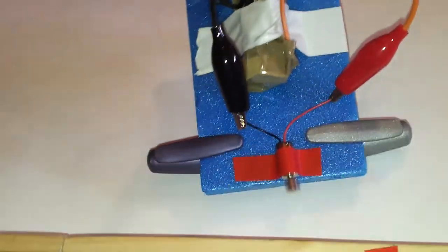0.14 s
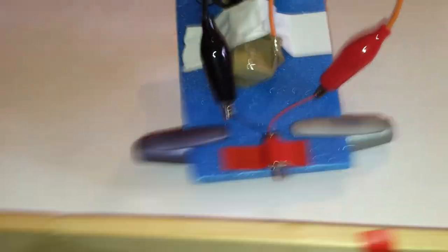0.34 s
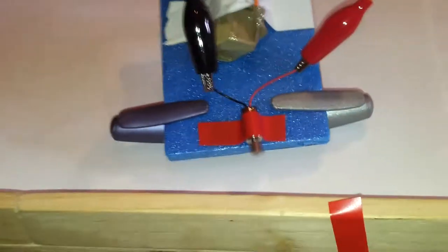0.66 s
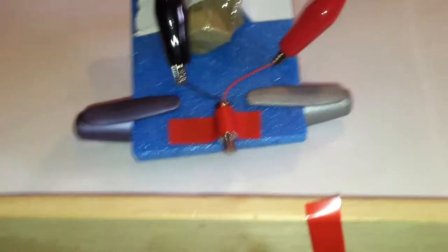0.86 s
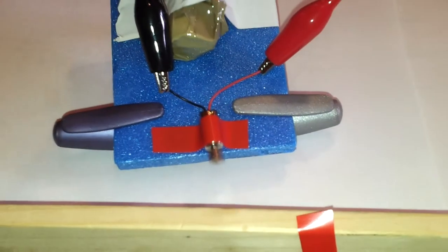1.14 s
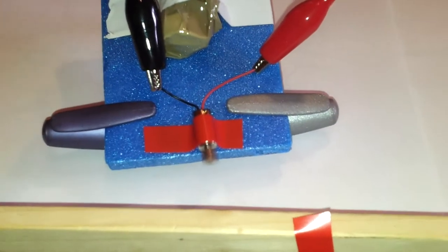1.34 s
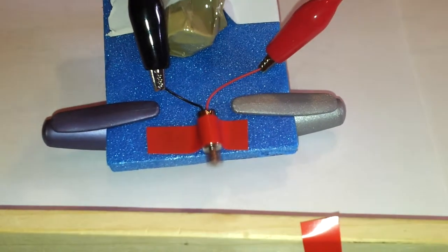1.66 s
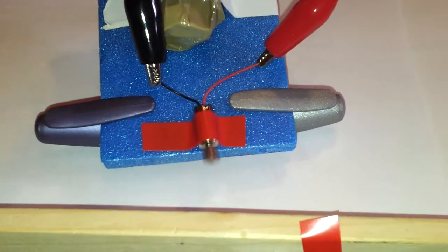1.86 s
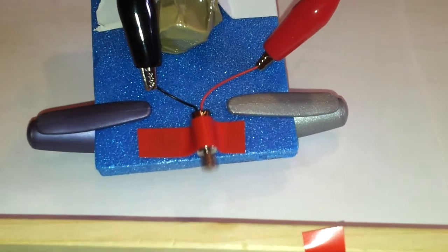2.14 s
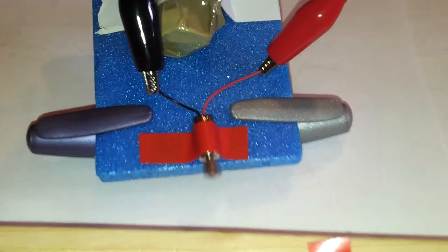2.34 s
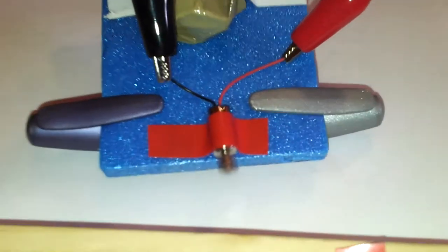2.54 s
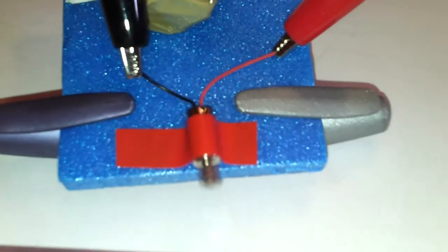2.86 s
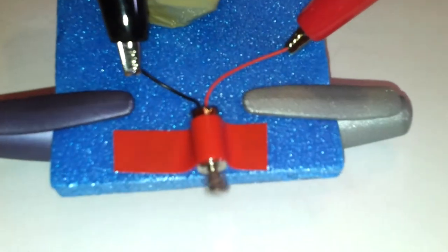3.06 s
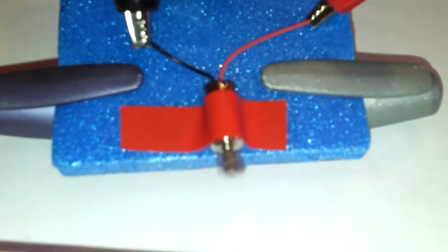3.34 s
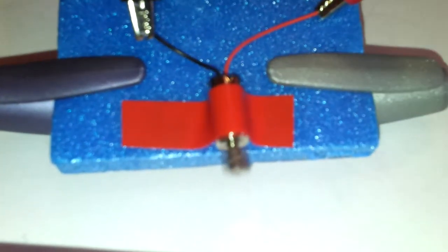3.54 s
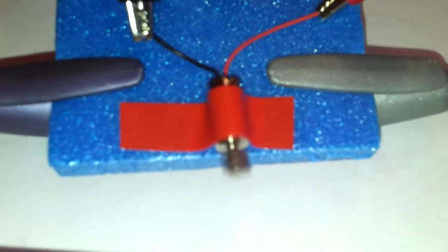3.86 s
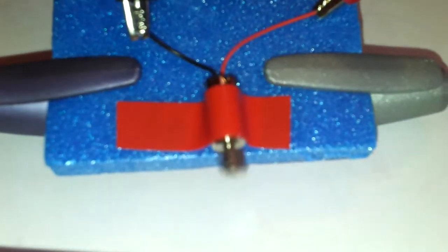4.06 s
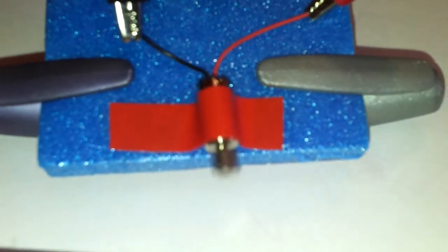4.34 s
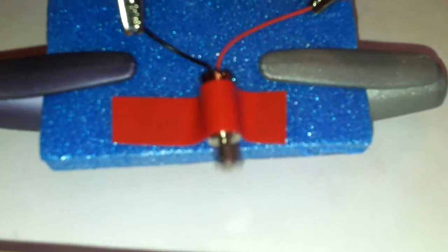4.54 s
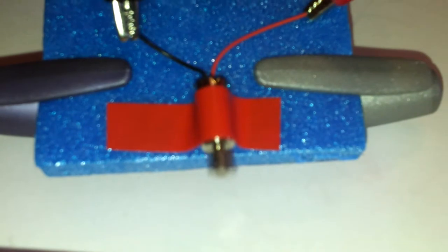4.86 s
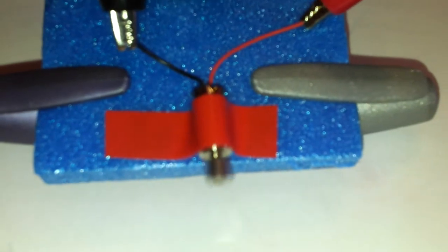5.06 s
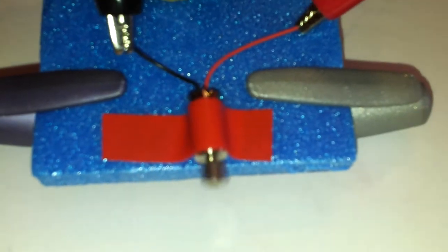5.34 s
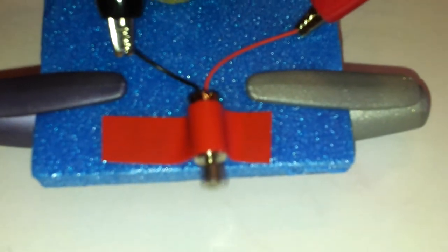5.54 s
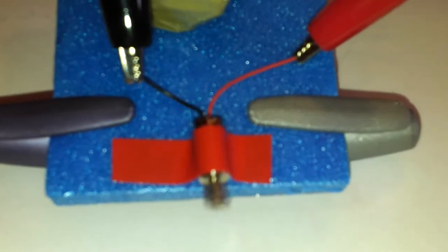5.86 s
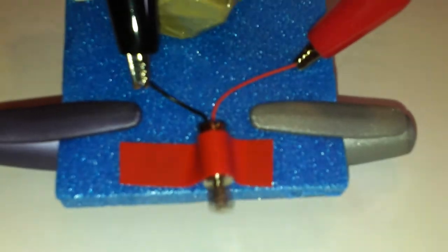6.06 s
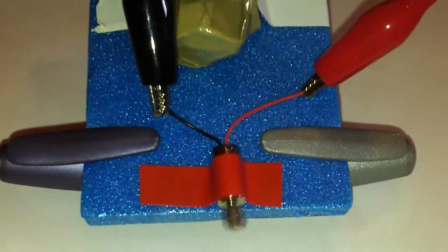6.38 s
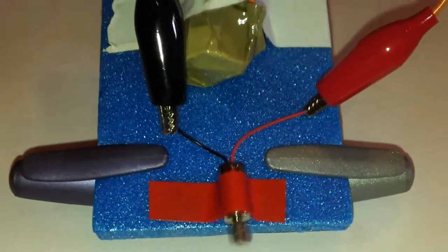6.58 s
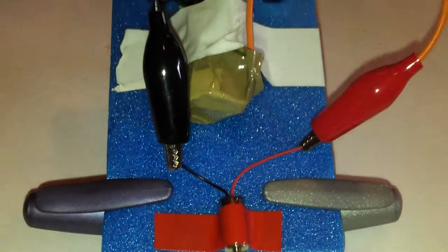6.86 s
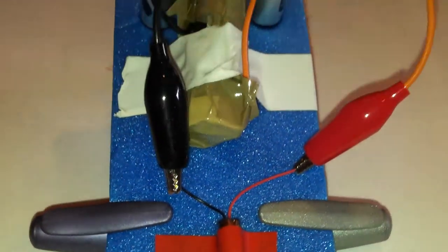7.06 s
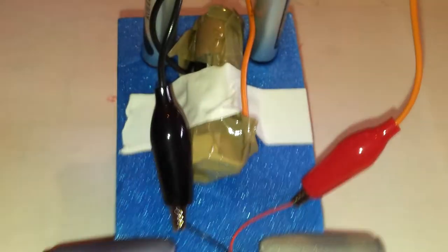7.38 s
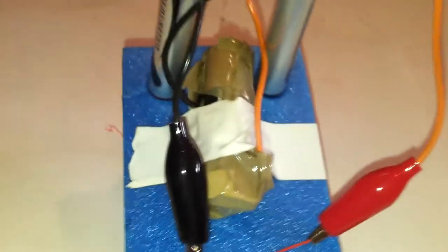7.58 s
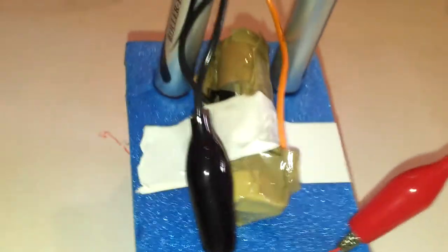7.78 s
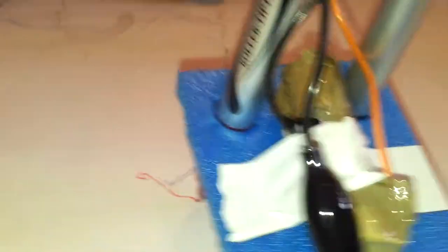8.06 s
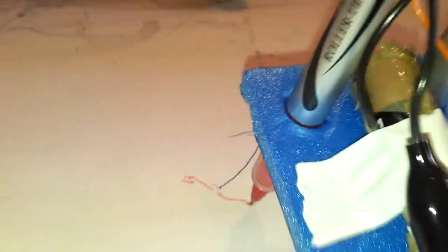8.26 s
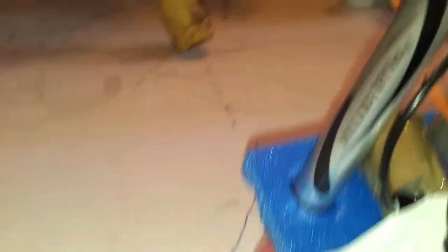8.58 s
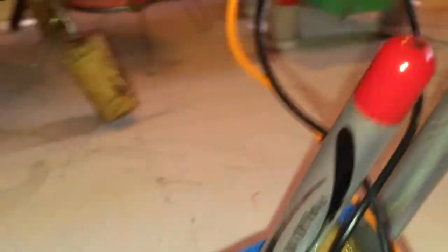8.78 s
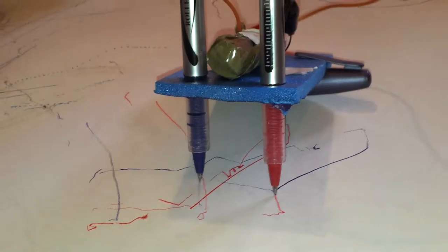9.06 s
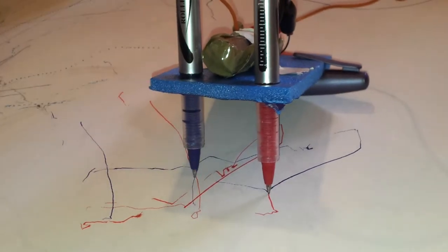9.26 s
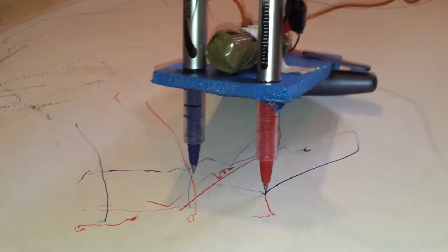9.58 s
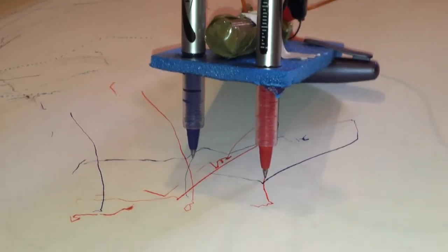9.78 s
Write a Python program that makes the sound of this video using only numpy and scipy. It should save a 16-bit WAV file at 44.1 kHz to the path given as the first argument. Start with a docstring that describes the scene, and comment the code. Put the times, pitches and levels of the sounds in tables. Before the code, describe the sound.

A small off-balance motor buzzes without pause, about seventy turns a second, so its clacks and knocks fuse into a hard, nasal rattle with a low hum, metallic ticking and raspy scratching. From 0 to 0.5 s a thin ringing whine and metallic buzz colour the opening. The microphone, close above the table, moves in from about 2 s; between 3 and 6 s the buzz is loudest and brightest, with slight roughness and small shifts in tone. It recedes by 6.7 s, the pitch sagging a little. Near 7.5 s a hand rustles, with a soft bump at 7.75 s, while a sharp metallic buzz grows on the left and pen rasp strengthens until 8.8 s. At 8.85 s the sound cuts abruptly to the side: duller, looser, more reverberant, slightly higher in pitch, with low judder and skittering scrapes calming towards the end at roughly 9.8 s.

```python
"""A room with a table: a foam-board robot stands on pens on paper, shaken by a motor's off-centre weight.
Each turn strikes a sharp clack, a duller knock about half a turn later and a short chirr: impulses that
ring damped resonances. Harmonics of the turning rate make the hum; shaped noise makes rasp and scratching.
It is heard from close above, then the view jumps to the side, where the robot skitters loosely.
A whine opens, metallic buzzes come in spells, the hand rustles, walls reverberate and the room hisses softly."""
import sys
import numpy as np
from scipy import signal
from scipy.fft import rfft, irfft, next_fast_len
from scipy.io import wavfile
from scipy.ndimage import map_coordinates

SR = 44100
rng = np.random.default_rng(int(sys.argv[2]) if len(sys.argv) > 2 else 0)


def output_pcm(signal):
    """Save a mono or channel-first signal as 16-bit PCM at the path in sys.argv[1].

    Samples are clipped to [-1, 1] before scaling.
    """
    pcm = np.clip(np.atleast_2d(signal).T, -1, 1) * 32767
    wavfile.write(sys.argv[1], SR, np.round(pcm).astype(np.int16))


N = 437017
TIME = np.arange(N) / SR  # seconds

# the sound cuts from a view above the robot to one from its side (s); there the board calms (duration, s)
SIDE_START_S, CALM_S = 8.85, 0.9
# Path of the microphone above the robot.
# Each row: time in seconds, nearness to the motor from 0 to 1, nearness to the pens from 0 to 1.
HOVER_PATH = [(0.1, 0.02, 0.3), (.6, 0.05, 0.26), (1.2, 0, 0.45), (2.1, 0.25, 0.14), (2.8, 0.82, 0.16),
              (3.9, 1, 0.1), (5.0, 0.81, 0.16), (5.8, 0.98, 0.02), (6.7, 0.16, 0.36), (7.4, 0.15, 0.46),
              (8.05, 0.2, 0.9), (8.8, 0.14, 0.7)]


def rattle(turns, clack, far):
    """Modal excitation: three contacts of each turn strike the same board and pen modes in different shares."""
    # Modes of board and pens. Each row: frequency in Hz, width in Hz, then relative level in dB
    # in the clack, in the knock and in the chirr.
    body_modes = [(1316, 470, -14, 5.5, -17.5), (1319, 356, 5.5, 3.5, -16), (1545, 94, 6, 2.8, 9.5),
                  (1718, 92, 13.5, 4, 9), (1861, 110, 13.5, -5, 20.5), (2093, 294, 0, 2, 17),
                  (2566, 660, -10.5, -13, -10)]
    # Landing of the robot, heard from above. Each row: time in seconds, clack level in dB,
    # chirr level in dB, place of the knock in turns after the clack.
    contact_above = [(0.15, -33.5, -32.5, .508), (.5, -34, -35, 0.53), (1.05, -33, -34.5, 0.5),
                     (2.1, -31.5, -34, 0.5), (2.9, -31.5, -34, 0.51), (3.9, -31.5, -34.5, .49),
                     (4.5, -30.8, -36, 0.52), (5.4, -30, -39, 0.5), (6.4, -31, -34.5, .493),
                     (7.4, -31.5, -36.5, 0.52), (7.85, -31.5, -32, 0.51), (8.25, -31, -29.5, .486),
                     (8.7, -29.5, -29.5, 0.52)]
    # The same landing heard from the side, with the same columns and units.
    contact_beside = [(9.25, -41.5, -38.5, .55), (9.6, -41.5, -48, .55)]
    # Spells in which the robot tips and its knock lands late. Each row: start in seconds, end in seconds,
    # lateness in turns, level added to the knock in dB.
    tipped_spells = [(0.57, 0.937, 0.011, 2.5), (2.247, 2.615, 0.017, 3), (3.98, 4.243, 0.018, 2.5),
                     (5.787, 6.1, 0.011, 2.4), (6.645, 6.795, 0.011, 2.2), (7.588, 7.957, 0.015, 3.5),
                     (8.41, 8.573, 0.016, 1.5)]
    # Spells of loose bouncing. Each row: start in seconds, end in seconds, looseness from 0 to 1.
    loose_spells = [(0.947, 1.954, 0.15), (4.356, 4.96, 0.25), (6.154, 6.652, 0.2), (7.252, 8.15, 0.17),
                    (8.153, 8.507, 0.18)]
    knock_above_db, knock_beside_db = -4, 0.5  # knock against clack
    chirr_turns = .749  # place of the chirr after the clack
    knock_drift_turns, chirr_drift_turns = 0.002, 0.0042  # rms drift within the turn
    tip_fade_s, loose_fade_s = 0.025, 0.015

    hz, width, *weights = np.transpose(body_modes)
    clack_modes, knock_modes, chirr_modes = (zip(hz, width, db) for db in weights)
    above, beside = np.array(curves(contact_above)), np.array(curves(contact_beside))
    clack_db, chirr_db, knock_at = (1 - far) * above + far * beside
    late, harder_db = sum(np.outer(change, spell(start, end, tip_fade_s))
                          for start, end, *change in tipped_spells)
    knock_db = (1 - far) * knock_above_db + far * knock_beside_db + harder_db
    loose = sum(slack * spell(start, end, loose_fade_s) for start, end, slack in loose_spells) + far

    knock_turns = turns - knock_at - late + knock_drift_turns * walk(7)
    knock = blows(knock_turns, loose, jitter_s=.000015, scatter_db=.6)
    drifting_turns = turns - chirr_turns + chirr_drift_turns * walk(6)
    # the chirr pushes the opposite way
    chirr = -blows(drifting_turns, 1.2 * loose, jitter_s=.00002, scatter_db=.8)
    board = ring(clack, clack_modes) + undb(knock_db) * ring(knock, knock_modes)
    return undb(clack_db) * board + undb(chirr_db) * ring(chirr, chirr_modes)


def ticking(turns, clack, far, grind_db=-24):
    """Modal radiation: only the hard clack excites the metal, whose colour depends on the listening position."""
    # Modes of motor can and clips. Each row: frequency in Hz, width in Hz, then relative level in dB
    # far from both motor and pens, near the motor, near the pens and from the side.
    metal_modes = [(2620, 384, -20, -15, 3, 4), (3100, 470, -5.5, -7.5, -32, -25),
                   (3500, 320, -7.5, -9.5, -6, -14), (4233, 280, 3.5, -14, -16, 8),
                   (4677, 430, -5.5, -1.5, 6.5, 7), (5076, 620, -2.5, -1, -1.5, -20),
                   (5770, 680, -23, -12.5, 1.5, 2.5), (6480, 1250, 0.5, 2.5, -18, -2),
                   (7545, 910, -3, 1, 5, 1), (9100, 1500, -16, -9, -7.5, -3.5),
                   (10830, 1500, -24.5, -16.5, -21, -3), (13100, 2100, -15, -16, -14, -24)]
    # the metal grinds on for a moment after each clack, more so from the side
    grind = unit(np.exp(-(turns % 1) / .08) * track(turns))
    hard = unit(clack) + undb(grind_db + 5 * far) * grind
    motor, pens = np.clip(curves(HOVER_PATH), 0, 1)
    above = np.array([np.maximum(1 - motor - pens, 0), motor, pens])
    shares = [*((1 - far) * above / above.sum(axis=0)), far]
    hz, width, *views = np.transpose(metal_modes)
    return sum(share * ring(hard, zip(hz, width, db)) for share, db in zip(shares, views))


def hum(turns, orders):
    """Forced vibration: the weight rocks the board at the turning rate and its multiples, each wavering."""
    partials = 0
    for k, db in orders:
        phase = 2 * np.pi * k * (turns + 0.032 + 0.0025 * k)
        partials = partials + undb(db + 1.05 * walk(9)) * np.cos(phase)
    return unit(partials)


def drone(turns, far, hum_db):
    """Radiation by position: the hum has one set of harmonics above and another beside, with low judder."""
    # Hum from above. Each row: multiple of the turning rate, relative level in dB.
    above_orders = [(1, -14), (2, -13.5), (3, -9.5), (4, -3), (7, -9), (8, -5.5), (9, 1), (10, -7.5),
                    (11, -9.5), (12, -9)]
    # Hum from the side. Each row: multiple of the turning rate, relative level in dB,
    # change in dB while the board shakes hard.
    beside_orders = [(1, 2.5, -5), (2, 2.5, -3), (3, 8, -7.5), (5, -5, 10), (6, -4, 5.5), (7, -4.5, 9.5),
                     (9, 5, -2), (10, -4, 4)]
    # Spectrum of the juddering board. Each row: frequency in Hz, relative level in dB per Hz.
    judder_spectrum = [(90, -16), (190, 7.5), (290, -12), (480, -2), (750, -7), (1500, -36)]
    judder_db = -47.5  # at the hardest shaking
    above = hum(turns, above_orders)
    beside = hum(turns, [(k, db + added_db * shaking()) for k, db, added_db in beside_orders])
    # from above the hum is 1.5 dB stronger than its tabled level
    humming = undb(hum_db) * (undb(1.5) * (1 - far) * above + far * beside)
    return humming + undb(judder_db) * far * shaking() * noise(judder_spectrum)


def brushes(turns):
    """Periodic friction: the brushes rub the same track on every turn, so their rasp repeats."""
    # Spectrum of the rasp. Each row: frequency in Hz, relative level in dB per Hz.
    rasp_spectrum = [(800, -13.5), (2200, 11.5), (2600, -11), (3450, 5.5), (3870, -14), (4300, 3.5),
                     (7000, -4.5), (11000, -21.5)]
    return colour(pressure(turns) * track(turns), rasp_spectrum)


def scratch(turns):
    """Friction noise: pen tips drag over random paper grain, loudest as the weight presses."""
    # Spectrum of the scratching. Each row: frequency in Hz, relative level in dB per Hz.
    grain_spectrum = [(300, -46), (2600, -28), (3400, -7), (3870, -6), (4400, 3.5), (4900, 7), (7500, 3),
                      (10500, -6), (12000, -9), (14500, -23)]
    return pressure(turns) * noise(grain_spectrum)


def skitter(turns):
    """Modulated friction: bouncing pen tips scrape in bursts once a turn, exciting broad resonances."""
    # Resonances of the skipping pen tips. Each row: frequency in Hz, width in Hz, relative level in dB.
    tip_modes = [(1060, 520, 0), (1850, 370, 3.5), (2450, 320, 1), (9600, 3200, -16)]
    contact = undb(2 * np.cos(2 * np.pi * (turns - .6)) + 1.2 * walk(60))
    return ring(contact * rng.standard_normal(N), tip_modes)


def buzzes(turns, far):
    """Pulsed resonance: a ringing whine near 1.95 kHz at the opening, and metallic buzzing in other spells."""
    # Whine (first row) and buzzes. Each row: start in seconds, end in seconds, resonance in Hz, width in Hz,
    # level in dB, left minus right in dB.
    buzz_spells = [(-0.1, 0.446, 1958, 108, -36.5, 5), (-0.1, .5, 4730, 750, -40.5, 5),
                   (0.082, .55, 4220, 380, -48, 15), (7.113, 7.85, 4750, 851, -35.5, 34),
                   (7.805, 9, 4820, 940, -31.5, 40), (7.913, 9, 4430, 570, -40.5, -4)]
    fade_s, lag_turns = 0.21, 0.0093
    out = 0
    for start, end, hz, width, db, pan_db in buzz_spells:
        pulses = blows(turns - lag_turns, far, jitter_s=.000012, scatter_db=.4)
        level = undb(db) * spell(start, end, fade_s)
        out = out + balance(pan_db)[:, None] * level * ring(pulses, [(hz, width, 0)])
    return (1 - far) * out


def blows(turns, loose, jitter_s, scatter_db):
    """Impulse train: one band-limited blow a whole turn; looseness scatters its time and strength."""
    at = np.interp(np.arange(1, int(turns[-1])), turns, np.arange(N))
    early, strong = rng.standard_normal((len(at), 2)).T
    slack = loose[at.astype(int)]
    at = at + early * np.hypot(jitter_s, slack * .00025) * SR
    strength = undb(strong * (scatter_db + .7 * slack))
    # a windowed sinc places each blow between samples
    taps = at.astype(int)[:, None] + np.arange(-7, 9)
    offset = taps - at[:, None]
    pulse = np.sinc(offset) * np.sinc(offset / 8)
    return np.bincount(np.clip(taps, 0, N - 1).ravel(), (strength[:, None] * pulse).ravel(), N)


def track(turns):
    """Periodic roughness: one random surface profile is rubbed again on every turn."""
    surface = rng.standard_normal(600)
    return map_coordinates(surface, [turns % 1 * len(surface)], order=3, mode="grid-wrap")


def pressure(turns):
    """Centrifugal loading: the circling weight presses hardest just before the clack."""
    return undb(4 * np.cos(2 * np.pi * (turns + .04)) + .7 * walk(25))


def shaking():
    """Decaying agitation: 1 when the side view starts, falling evenly to 0 as the board calms."""
    return np.clip(1 - (TIME - SIDE_START_S) / CALM_S, 0, 1)


def heard(gains, far):
    """Proximity: from above a part's dB level follows the path, from the side the calming of the board."""
    base_db, motor_db, pens_db, side_db, shaking_db = gains
    motor, pens = curves(HOVER_PATH)
    above_db = base_db + motor_db * motor + pens_db * pens
    return (1 - far) * above_db + far * (side_db + shaking_db * shaking())


def bearing(far):
    """Level panning: left minus right in dB goes from slightly left to right, then left over the pens."""
    motor_db, pens_db, side_db = -3, 6.5, 0
    start_db, settle_s = 4.5, 0.44  # first offset and its decay time
    swing_middle_s, swing_length_s = 7.93, 0.52
    swing = np.clip((TIME - swing_middle_s) / swing_length_s + .5, 0, 1)
    above = motor_db * (1 - swing) + pens_db * swing + start_db * np.exp(-TIME / settle_s)
    return (1 - far) * above + far * side_db


def balance(pan_db):
    """Constant-power panning: left and right gains of equal total power."""
    gains = undb(np.array([pan_db, -pan_db]) / 2)
    return gains / np.sqrt(np.mean(gains ** 2, axis=0))


def ports(x, pan_db, lag_s):
    """Time and level differences: the left port hears later as the source moves to the right."""
    left = delayed(x, lag_s * np.clip(1 - pan_db / 4, 0, 2))
    return np.array([left, x]) * balance(pan_db)


def bounced(x, pan_db, table_db=-13):
    """Comb filtering: ticks arrive directly and off the table, by paths that change as the hand sways."""
    sway = .04  # rms change of the path, as a share
    table = np.array([delayed(x, lag_s * (1 + sway * walk(.9))) for lag_s in (.0004, .00058)])
    return ports(x, pan_db, lag_s=.000045) + undb(table_db) * balance(pan_db) * table


def handling():
    """Contact noise: ragged rustles of the hand, then a soft resonant bump on the microphone's case."""
    # Rustles. Each row: middle in seconds, length in seconds, level in dB at the middle.
    rustle_times = [(7.51, 0.13, -36), (7.642, 0.19, -38)]
    # Bumps. Each row: start in seconds, resonance in Hz, width in Hz,
    # level in dB before the rise and decay, decay time in seconds.
    case_bumps = [(7.748, 100, 110, -34, 0.034)]
    rustle = noise([(500, -28), (2500, -3), (5000, -2), (7500, -4), (11500, -5), (13000, -10), (14500, -26)])
    rustle *= undb(1.5 * walk(60)) * unit(undb(3 * walk(900)))  # slow and fast raggedness
    rustle *= sum(undb(db) * np.exp(-(2 * (TIME - s) / length) ** 2) for s, length, db in rustle_times)
    bumps = 0
    for s, hz, width, db, decay_s in case_bumps:
        age = np.maximum(TIME - s, 0)
        envelope = (1 - np.exp(-age / .003)) * np.exp(-age / decay_s)
        bumps = bumps + undb(db) * envelope * ring(rng.standard_normal(N), [(hz, width, 0)])
    return rustle + bumps


def echoes(x, t60, delay_s):
    """Reverberation: dense reflections decay exponentially, different at each port."""
    t = TIME[:SR // 2]
    tail = rng.standard_normal((2, len(t))) * undb(-60 * t / t60) * (t > delay_s)
    return np.array([signal.oaconvolve(x, h / np.linalg.norm(h))[:N] for h in tail])


def room_air():
    """Partly coherent noise: the ports share some of the background and each adds its own."""
    # Spectrum of the background. Each row: frequency in Hz, relative level in dB per Hz.
    room_spectrum = [(25, -7.5), (130, -7.5), (270, -5), (370, -12), (800, -12), (3000, -9.5),
                     (14000, -21.5)]
    shared_db, own_above_shared_db = -48.5, 7.0
    own = np.array([noise(room_spectrum), noise(room_spectrum)])
    return undb(shared_db) * (noise(room_spectrum) + undb(own_above_shared_db) * own)


def undb(db):
    """Logarithmic level: decibels to amplitude gain."""
    return 10 ** (np.asarray(db) / 20)


def unit(x):
    """Normalisation: scale to rms 1."""
    return x / np.sqrt(np.mean(x ** 2))


def curves(rows):
    """Linear interpolation: the columns of a timed table, one value a sample."""
    s, *columns = np.transpose(rows)
    return [np.interp(TIME, s, c) for c in columns]


def spell(start, end, fade):
    """Gating: 1 between two times, with linear edges."""
    return np.clip(np.minimum(TIME - start, end - TIME) / fade + .5, 0, 1)


def walk(rate):
    """Slow modulation: random points, `rate` a second, joined by lines and scaled to rms 1."""
    count = int(rate * N / SR) + 2
    return unit(np.interp(TIME * rate, np.arange(count), rng.standard_normal(count)))


def delayed(x, delay_s):
    """Propagation delay: x later by a fixed or changing time."""
    return map_coordinates(x, [np.arange(N) - delay_s * SR], order=3)


def shape(x, points):
    """Linear filtering: multiply the spectrum of x by a response of (Hz, dB) points."""
    hz, db = np.transpose(points)
    size = next_fast_len(N, True)
    f = np.maximum(np.fft.rfftfreq(size, 1 / SR), 1)
    return irfft(rfft(x, size) * undb(np.interp(np.log(f), np.log(hz), db)), size)[:N]


def colour(x, points):
    """Spectral shaping: filter x by (Hz, dB) points and scale it to rms 1."""
    return unit(shape(x, points))


def noise(points):
    """Filtered random noise: a spectrum of (Hz, dB) points at rms 1."""
    return colour(rng.standard_normal(N), points)


def ring(x, modes, size=2048):
    """Minimum-phase resonance: damped modes (Hz, width in Hz, dB) answer x causally, at rms 1."""
    f = np.fft.rfftfreq(size, 1 / SR)
    gain = sum(undb(db) / (1 + (2 * (f - hz) / width) ** 2) ** 1.393 for hz, width, db in modes)
    # folding the cepstrum forward in time makes the response causal
    cepstrum = irfft(np.log(gain))
    cepstrum[1:size // 2] *= 2
    cepstrum[size // 2 + 1:] = 0
    response = irfft(np.exp(rfft(cepstrum)))
    return unit(signal.oaconvolve(x, response)[:N])


def scene():
    """Superposition: the robot, the table and walls around it, the hand and the quiet room."""
    # Turning rate of the motor, which slowly sags and is higher again at the end.
    # Each row: time in seconds, turns per second in Hz.
    motor_speed = [(0, 70.6), (0.5, 70.66), (1.1, 70.22), (1.45, 70.32), (1.75, 70.1), (2.2, 70.33),
                   (2.7, 70.3), (3.1, 70.48), (4.25, 70.2), (4.6, 69.88), (5.85, 69.92), (6.6, 69.5),
                   (6.9, 69.72), (7.3, 69.63), (7.75, 69.36), (8.25, 69.5), (8.9, 69.38), (9.45, 70.85),
                   (9.9, 71)]
    # Loudness settings of hum, tick, rasp and scratch. Each row: level in dB far from motor and pens,
    # dB added near the motor, dB added near the pens, level in dB from the side,
    # dB added there while the board shakes hard.
    loudness = {"hum": (-50.5, 5.5, 2, -50, 7.5), "tick": (-35, 6, -2.5, -39, 1.5),
                "rasp": (-44.5, 5, 8.5, -71, 3), "scratch": (-43, 4, 3.5, -49, 6)}
    skitter_db = -42.5

    far = np.clip((TIME - SIDE_START_S) / 0.0048, 0, 1)  # 0 from above, 1 from the side
    turns = .72 + np.cumsum(curves(motor_speed)[0]) / SR
    hum_db, tick_db, rasp_db, scratch_db = (heard(gains, far) for gains in loudness.values())
    pan_db = bearing(far)

    clack = blows(turns, .5 * far, jitter_s=.000007, scatter_db=.35)
    board = rattle(turns, clack, far) + undb(skitter_db) * far * skitter(turns)
    metal = undb(tick_db) * ticking(turns, clack, far)
    direct = ports(board + drone(turns, far, hum_db), pan_db, lag_s=.00008)
    ticks = bounced(metal, 0.17 * pan_db - 0.56 * far) + buzzes(turns, far)
    # the rasp and scratching scatter widely and reach each port separately
    rubbing = balance(pan_db) * np.array([undb(rasp_db) * brushes(turns) + undb(scratch_db) * scratch(turns)
                                          for _ in range(2)])
    # each view has its own share of the walls
    walls = sum(undb(db) * place * echoes(place * (board + metal), t60=0.13, delay_s=0.0058)
                for place, db in ((1 - far, -17), (far, -9)))
    return direct + ticks + rubbing + walls + room_air() + handling()


def record(dry):
    """Transducer response: each port colours the sound in its own way, and the recorder cuts the top."""
    # Colour of the microphone ports. Each row: frequency in Hz, left response in dB, right response in dB.
    port_response = [(1310, 0, -1), (1940, -1, 0), (5680, -3.5, 0), (6790, 5, -4.5), (7820, -1, 3),
                     (9700, -12.5, 2), (10830, 1.5, 1.5), (11660, -24, -3), (13500, -6.5, -4.5)]
    top_hz = 14900
    hz, *responses = np.transpose(port_response)
    coloured = np.array([shape(x, list(zip(hz, db))) for x, db in zip(dry, responses)])
    return signal.sosfilt(signal.ellip(8, .2, 70, top_hz, fs=SR, output="sos"), coloured)


dry = scene()
out = record(dry)
output_pcm(out)
```